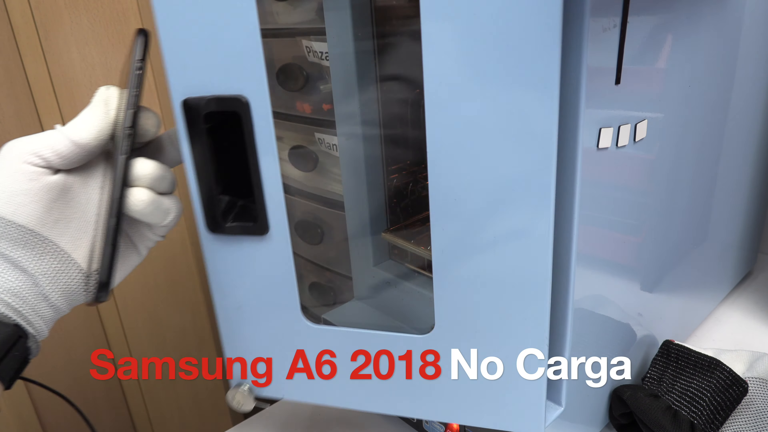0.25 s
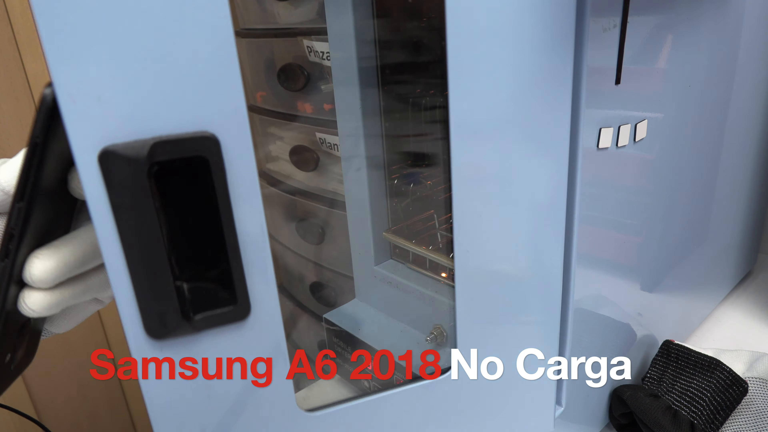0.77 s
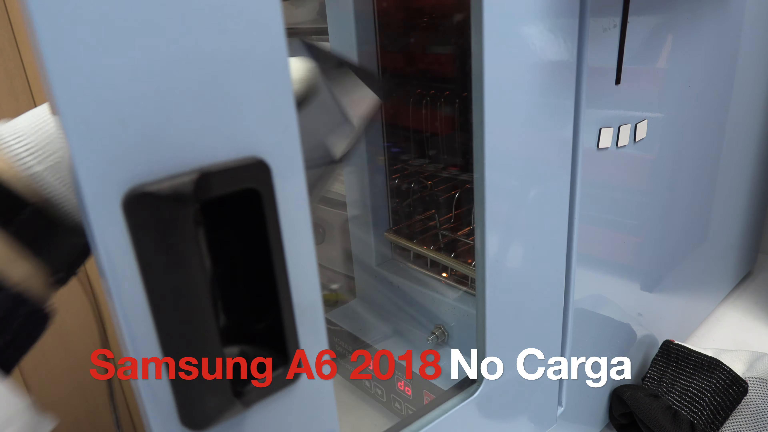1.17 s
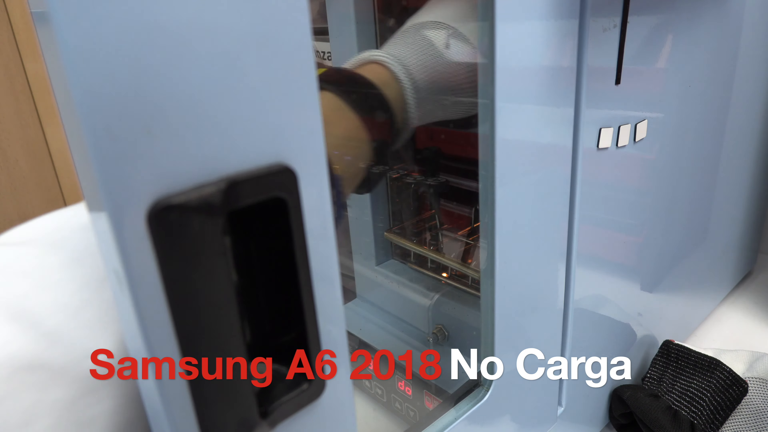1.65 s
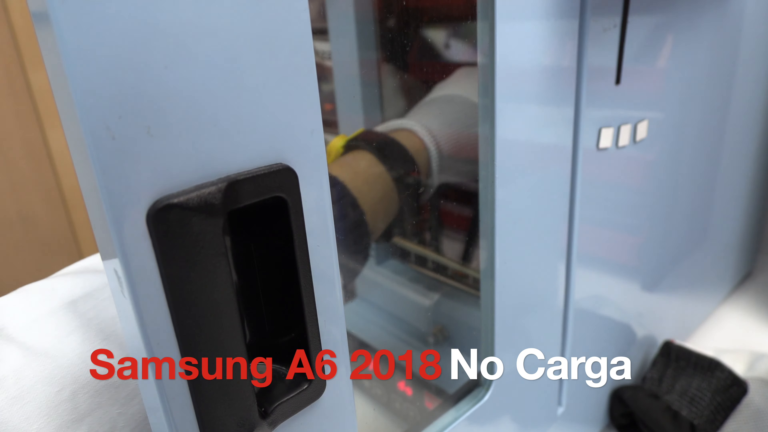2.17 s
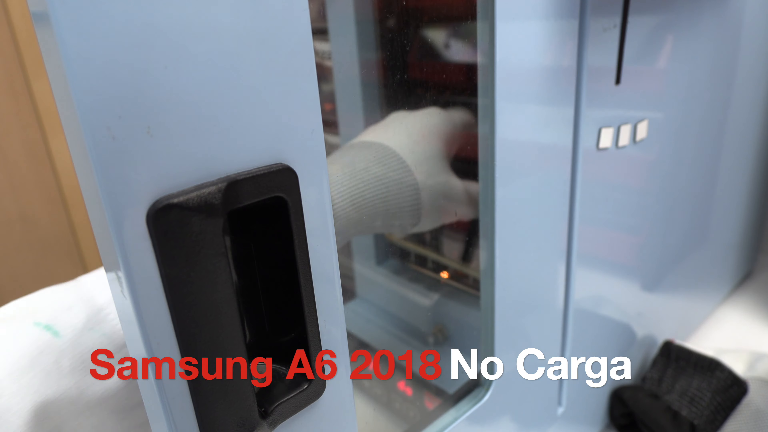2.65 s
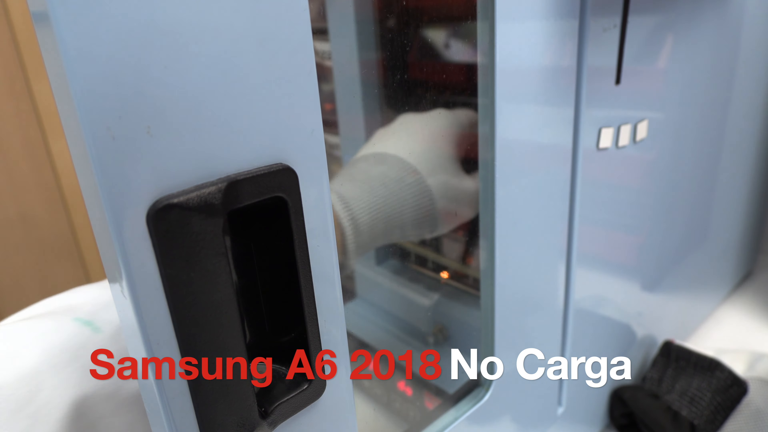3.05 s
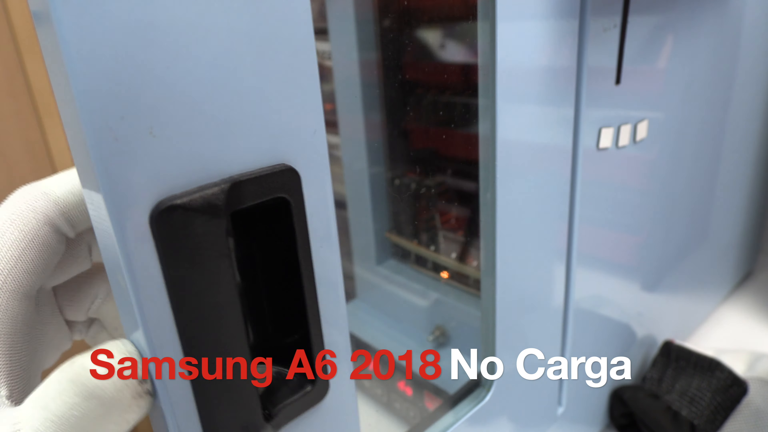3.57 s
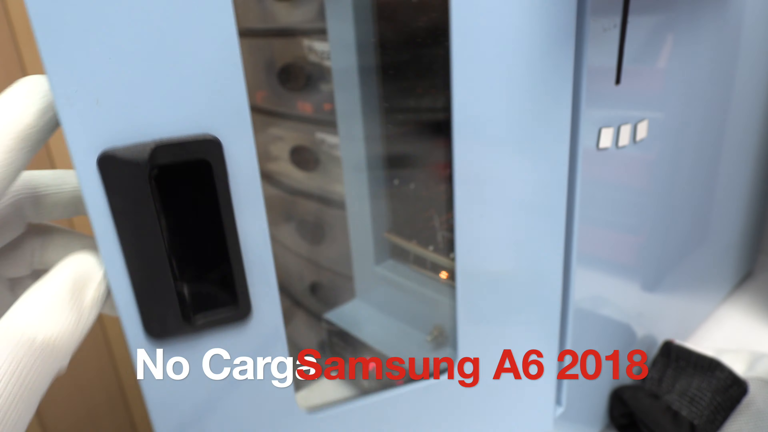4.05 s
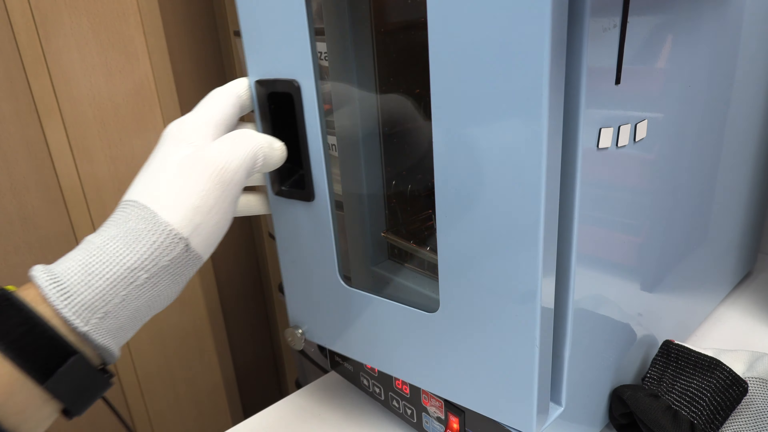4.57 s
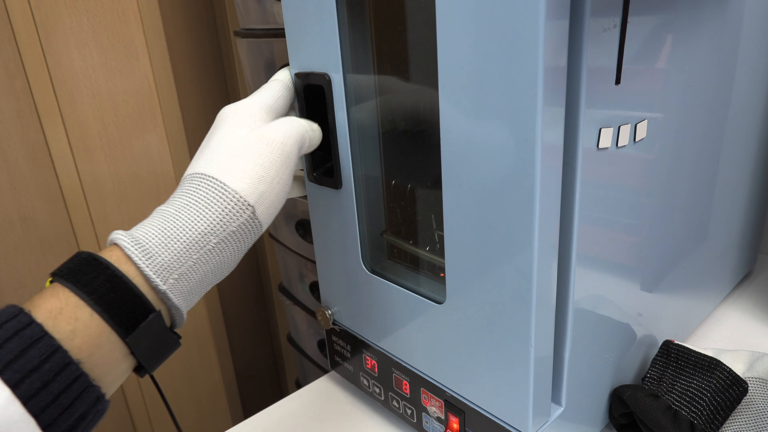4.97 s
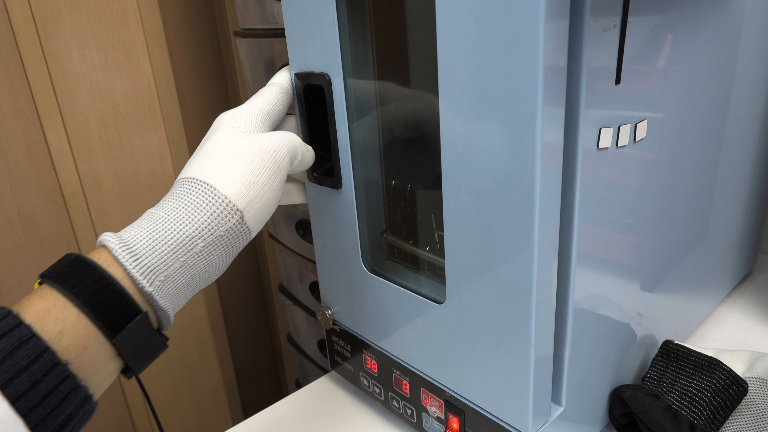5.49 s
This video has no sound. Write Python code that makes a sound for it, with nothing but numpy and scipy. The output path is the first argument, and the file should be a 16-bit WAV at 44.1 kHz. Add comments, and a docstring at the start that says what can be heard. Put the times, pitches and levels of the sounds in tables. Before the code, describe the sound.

A gloved hand clicks open a small sheet-metal cabinet door, knocks a phone onto the shelf inside, then shuts the door with a loud latch clack.

```python
"""The sheet-metal door of a small heating cabinet is opened by a gloved hand and later pressed shut on its latch.
Its blows are rattling contacts that excite damped modes, over a clack, thud and tick of shaped noise.
In between, a phone knocks on the shelf inside in the same way and drags over it as uneven, singing noise.
Glove and sleeve rub as grainy noise, and brief tones waver and die away after some blows.
The microphones stand close; decaying noise gives the echoes, steady noise and fuzzy fan tones the quiet workshop."""
import sys
import numpy as np
from scipy import signal
from scipy.fft import rfft, irfft
from scipy.io import wavfile
from scipy.ndimage import uniform_filter1d

SR = 44100
rng = np.random.default_rng(int(sys.argv[2]) if len(sys.argv) > 2 else 0)


def attenuation_scalar(level_db):
    """Turn a level in dB into a linear amplitude multiplier (20 dB per decade)."""
    decades = np.asarray(level_db, float) / 20
    return 10 ** decades


def store_pcm(level_fs):
    """Save levels as 16-bit WAV."""
    pcm = np.round(np.clip(level_fs, -1, 1) * 32767).astype(np.int16)
    wavfile.write(sys.argv[1], SR, np.atleast_2d(pcm).T)


N = 252620  # length in samples

# modes of the shelf and heated chamber: (frequency [Hz], level [dB], t60 [s])
SHELF_MODES = [(91.4, -10, 0.28), (165.9, 5, 0.43), (213.6, 1.5, 0.43), (247.2, 6, 0.16),
               (597.3, -3.5, 0.2), (645, -1, 0.12), (882, 3, 0.18), (953, 11.5, 0.051), (1197, -17, 0.13),
               (1302, 1, 0.18), (1410, -7, 0.037), (1550, -0.5, 0.17), (1670, -11, 0.14), (1774, -7, 0.066),
               (2073, -2.5, 0.054), (2200, -7, 0.12), (2300, -29, 0.1), (2820, -18, 0.087),
               (2800, -3, 0.11), (2950, -10, 0.089)]


def evened(x):
    """Scales to rms 1."""
    return x / np.sqrt(np.mean(x ** 2) + 1e-20)


def peaked(x):
    """Scales to peak 1."""
    return x / abs(x).max()


def read(points, hz):
    """Reads a table on a log-frequency axis."""
    f, value = np.transpose(points)
    return np.interp(np.log(hz + 1), np.log(f + 1), value)


def colour(x, points):
    """Filters x by a table of (frequency [Hz], gain [dB])."""
    gain = attenuation_scalar(read(points, np.fft.rfftfreq(x.shape[-1], 1 / SR)))
    return irfft(rfft(x) * gain, x.shape[-1])


def pair(size, same):
    """Left and right noise spectra, alike by the share same(Hz); with their frequencies and frame times."""
    frames, hz = size // 128 + 5, np.fft.rfftfreq(512, 1 / SR)
    a, b, c, d = rng.standard_normal((frames, 257, 4)).T
    share = np.clip(read(same, hz), -1, 1)[:, None]
    left = a + 1j * b
    right = share * left + np.sqrt(1 - share ** 2) * (c + 1j * d)
    return np.array([left, right]), hz, np.arange(frames) * 128 / SR


def air():
    """Steady workshop noise with drifting patches in time and pitch, plus the fuzzy tones of a fan."""
    # spectrum of the room air: (frequency [Hz], gain [dB])
    air_spectrum = [(18, -41), (30, -16), (64, -12.5), (158, -18), (234, -1.5), (267, -4), (355, -11),
                    (552, -6), (612, -8), (928, -11), (1000, -11), (2430, -15.5), (7630, -25.5),
                    (13200, -39), (15000, -67)]
    # left-right likeness of the room air: (frequency [Hz], likeness [0-1])
    air_same = [(60, 0.85), (180, 1), (550, 0.81), (1650, 0.58), (4970, 0.23), (15000, 0.96)]
    # fan tones: (frequency [Hz], width [Hz], level [dB])
    fan_tones = [(107.4, 43, -78), (166, 26, -78), (265.9, 11, -71.5), (335, 20, -78.5), (513, 50, -81),
                 (547.7, 5.5, -78.5), (934, 57, -81.5)]
    spectra, _, _ = pair(N, air_same)
    patches = uniform_filter1d(rng.standard_normal(spectra[0].shape), 8, 0)
    patches_db = 2.0 * evened(uniform_filter1d(patches, 30, 1))
    noise = signal.istft(spectra * attenuation_scalar(patches_db), nperseg=512, noverlap=384)[1][:, :N]
    hiss = attenuation_scalar(-64.5) * evened(colour(noise, air_spectrum))

    f = np.fft.rfftfreq(N, 1 / SR)
    white = rfft(rng.standard_normal(N))
    fan = np.zeros(N)
    for centre_hz, width_hz, db in fan_tones:
        fan += attenuation_scalar(db) * evened(irfft(white / (1 + (2 * (f - centre_hz) / width_hz) ** 2), N))
    return hiss + fan


def stroke(start, firmest, end, db, swell):
    """Pressure swells to the firmest moment and lets go; an end set ahead of that moment cuts it off."""
    ramp = np.interp(np.arange(N) / SR, [start, firmest, end], [0, 1, 0])
    return attenuation_scalar(db) * ramp ** swell  # higher swell = sharper rise and fade


def rubs():
    """Dense slips of cloth fibres on painted steel; the bright part whispers around a moving pitch."""
    # strokes of glove and sleeve:
    # (start [s], firmest [s], end [s], level of the dull part [dB], bright part relative to it [dB])
    rub_strokes = [(-.1, .01, 0.097, -54.5, -11), (0.049, 0.06, 0.14, -58.5, 0),
                   (1.038, 1.052, 1.11, -58.5, -12.5), (1.08, 1.24, 1.41, -65.5, -10),
                   (1.324, 1.433, 1.625, -61.5, -6), (1.534, 1.644, 1.97, -63, -9),
                   (2.503, 2.732, 2.9, -72.5, -10), (3.024, 3.21, 3.66, -71.5, -10),
                   (3.372, 3.407, 3.75, -67, -12), (3.912, 4.033, 4.03, -67.5, -7),
                   (4.06, 4.13, 4.2, -74, 1.1), (4.19, 4.4, 3.6, -78, 7.5), (4.652, 4.76, 4.86, -61, -15.5),
                   (4.526, 4.633, 4.762, -57, 4), (4.758, 4.852, 4.9, -59, 7.5),
                   (4.84, 4.963, 5.12, -52.5, 0)]
    # spectrum of the rubbing: (frequency [Hz], gain [dB])
    rub_spectrum = [(290, -11.5), (500, 9.5), (545, 12), (990, 3.5), (1350, 9), (1880, 11.5), (3090, 6),
                    (4940, -18.5), (5950, -15.5), (6960, -18), (11400, -32), (13400, -67.5), (15000, -57.5)]
    # path of the whisper: (time [s], centre [Hz])
    whisper_path = [(0, 5940), (1.05, 7200), (1.4, 7560), (1.7, 7800), (3.9, 6300), (4.8, 6200), (5, 5700)]
    slips = rng.standard_normal(N) * attenuation_scalar(1.15 * np.minimum(rng.exponential(1, N), 4))
    hiss = colour(slips, rub_spectrum)
    dull = signal.sosfiltfilt(signal.butter(4, 4250, fs=SR, output="sos"), hiss)

    # a resonance 900 Hz wide follows the path: shift down, smooth, shift back up
    pole = np.exp(-np.pi * 900 / SR)
    centre_hz = np.interp(np.arange(N) / SR, *np.transpose(whisper_path))
    turn = np.exp(2j * np.pi * np.cumsum(centre_hz) / SR)
    whisper = (turn * signal.lfilter([1 - pole], [1, -pole], slips / turn)).real
    bright = evened(evened(hiss - dull) + 0.3 * evened(whisper))

    out = np.zeros(N)
    for *row, bright_db in rub_strokes:
        out += stroke(*row, swell=0.9) * (evened(dull) + attenuation_scalar(bright_db) * bright)
    return out


def room(x):
    """Echoes of chamber and workshop: noise that dies away band by band."""
    # decay of the echoes: (frequency [Hz], t60 [s])
    room_decay = [(100, 0.98), (300, 0.4), (1000, 0.46), (2500, 0.44), (6000, .3), (12000, 0.26)]
    # left-right likeness of the echoes: (frequency [Hz], likeness [0-1])
    room_same = [(200, 1.), (600, 0.9), (2000, 0.79), (8000, 0.34)]
    spectra, hz, t = pair(SR // 2, room_same)
    fade = attenuation_scalar(-60 * t / read(room_decay, hz)[:, None])
    tail = signal.istft(spectra * fade, nperseg=512, noverlap=384)[1]
    tail = colour(tail, [(100, -5.5), (700, -3), (1500, -1.5), (15000, 0.0)])  # less bass comes back
    tail *= 1 - np.exp(-np.arange(tail.shape[1]) / SR / 0.00053)
    return signal.fftconvolve(x.mean(0)[None], tail / np.linalg.norm(tail[0]), axes=1)[:, :N]


def tones():
    """Single tones stand out after some blows: each holds one wavering pitch and dies away."""
    # (time [s], level [dB], frequency [Hz], t60 [s])
    tone_rows = [(.001, -51.5, 1980, 0.21), (.001, -52.5, 2770, 0.22), (.157, -34, 550, 0.031),
                 (0.645, -38.5, 1674, 0.091), (0.651, -50, 1254, 0.16), (0.658, -55, 222, 0.41),
                 (1.943, -35.5, 1530, 0.12), (2.406, -50.5, 1520, 0.13), (2.839, -48.5, 1467, 0.49),
                 (2.856, -52, 3186, 0.33), (2.902, -39, 618, 0.1), (3.003, -44.5, 630, 0.11),
                 (4.548, -46, 543, 0.17), (4.549, -45, 897, 0.23), (4.868, -49, 590, 0.041),
                 (4.992, -35, 105, 0.3), (4.998, -39.5, 415, 0.22), (5.013, -38, 261.2, 0.32)]
    out, t = np.zeros(N + SR), np.arange(SR // 2) / SR
    for s, db, hz, t60 in tone_rows:
        noise = rng.standard_normal((2, len(t)))
        sway, flutter = (evened(uniform_filter1d(v, 250)) for v in noise)
        phase = 2 * np.pi * np.cumsum(hz * (1 + 0.014 * sway)) / SR
        tone = np.sin(phase) * attenuation_scalar(3.8 * flutter)
        fade = attenuation_scalar(db - 60 * t / t60) * (1 - np.exp(-t / 0.0016))
        out[round(s * SR):][:len(t)] += tone * fade
    return out[:N]


def blows(rows, modes, crack, contact_ms, knock_db, ring_db, clack_t60, width, tail, tick_tail,
          thump_db, thump_hz, thump_width):
    """A short rattling contact rings a body: low modes thud, high ones ring in a dense clack, the treble ticks."""
    # left-right likeness of clack and tick: (frequency [Hz], likeness [0-1])
    clack_same = [(100, 1.), (500, 0.96), (1500, 0.78), (4000, 0.78), (10000, 0.68)]
    out, t = np.zeros((2, N + SR)), np.arange(SR // 2) / SR
    f = np.fft.rfftfreq(len(t), 1 / SR) + 1
    same = np.clip(read(clack_same, f), -1, 1)
    hz, db, t60 = np.transpose(modes)
    low = hz < 650  # these modes thud, the others ring
    linger = attenuation_scalar(-60 * t / clack_t60) * (1 - np.exp(-t / 0.0011))  # countless small modes linger
    for s, peak_db, thud_db, tick_db, clack_hz in rows:
        luck = rng.standard_normal((2, len(hz)))
        noise = rng.standard_normal((5, len(t)))

        # each blow lands on another spot; modes near the clack speak most
        rings = attenuation_scalar(db + 2.0 * luck[0])[:, None] * np.sin(2 * np.pi * hz[:, None] * t)
        rings *= attenuation_scalar(-60 * t / t60[:, None])
        near = np.where(low, 1, 1 / (1 + (np.log2(hz / clack_hz) / 0.4) ** 2))
        rings *= (near * np.sign(luck[1]))[:, None]

        press = np.exp(-(t * 1000 / contact_ms) ** 0.89) * (1 - np.exp(-t * 1000 / (0.17 * contact_ms)))
        press *= attenuation_scalar(1.45 * evened(uniform_filter1d(noise[4], 50)))  # the contact chatters
        ring = signal.fftconvolve(rings[~low].sum(0), noise[0] * press)[:len(t)]

        a, b, c = rfft(noise[1:4])
        both = np.array([a, same * a + np.sqrt(1 - same ** 2) * b])
        heft_db = 0.33 * np.clip(thud_db - peak_db + 15, -20, 10)  # heavy blows knock more
        knock = attenuation_scalar(knock_db + heft_db) / (1 + (np.log2(f / 700) / 0.59) ** 4)  # duller body under the clack
        clack_band = 1 / (1 + (np.log2(f / clack_hz) / width) ** 4)
        clack = evened(irfft(both * (knock + clack_band))) * (press + tail * linger)

        soft_hz = 9300 * attenuation_scalar(0.28 * (tick_db + 64))  # the softer the touch, the duller its tick
        tick = evened(colour(irfft(both / (1 + (f / soft_hz) ** 4)), crack))
        tick *= press + tick_tail * linger

        thump = evened(irfft(c / (1 + (np.log2(f / thump_hz) / thump_width) ** 4)))
        thump *= attenuation_scalar(thump_db - 60 * t / 0.24)
        low_ring = rings[low].sum(0)
        thud = low_ring / np.sqrt(np.mean(low_ring[:2000] ** 2)) + thump
        thud *= 1 - np.exp(-t / 0.0069)

        muffle_db = 0.5 * min(peak_db + 42.0, 0)  # soft touches of a glove damp the ring
        body = peaked(clack) + attenuation_scalar(ring_db + muffle_db) * peaked(ring)
        blow = attenuation_scalar(peak_db) * body + attenuation_scalar(thud_db) * peaked(thud) + attenuation_scalar(tick_db) * tick
        out[:, round(s * SR):][:, :len(t)] += blow
    return out[:, :N]


def door_blows():
    """Door panel and latch are struck by brief contacts; the clack lingers in the sheet metal."""
    # (time [s], clack level [dB], thud level [dB], tick level [dB], clack centre [Hz])
    door_rows = [(0.002, -41.5, -48, -58, 1900), (0.062, -35, -45, -51, 1780),
                 (0.132, -62, -54.5, -67, 1550), (0.155, -27.5, -71, -62, 2240),
                 (0.162, -30, -47.5, -71, 2100), (0.645, -38.5, -56.5, -64, 2000),
                 (0.743, -55, -58.5, -64, 2300), (0.957, -45.5, -56, -55, 1690),
                 (0.979, -48, -66, -62, 1420), (1.048, -67, -62, -61.5, 2180),
                 (1.089, -57, -54.5, -68, 1640), (3.44, -43, -56, -59, 2450), (3.757, -49, -60, -75, 2930),
                 (4.154, -54, -70, -58.5, 1700), (4.526, -48.5, -47, -58, 2620),
                 (4.546, -25.5, -43, -35.5, 2270), (4.558, -20.5, -43, -42.5, 2220),
                 (4.869, -48, -59.5, -53, 3020), (4.978, -18.5, -55, -35.5, 2520),
                 (4.985, -15, -46.5, -23, 2460), (4.994, -20, -33.5, -18, 2320),
                 (5.003, -23, -31, -23.5, 1760), (5.016, -24, -38, -44, 1670)]
    # modes of door panel and latch: (frequency [Hz], level [dB], t60 [s])
    door_modes = [(60.7, -4.5, 0.25), (85.6, -4.5, 0.26), (113.8, -10, 0.46), (172.8, 6.5, 0.23),
                  (210, 1.5, 0.26), (257, 8, 0.22), (337, -25, 0.16), (378, -1, 0.37), (450, 6.5, 0.17),
                  (522, 9, 0.15), (828, 5, 0.102), (1130, -1.5, 0.18), (1298, 2, 0.11), (1395, 4.5, 0.11),
                  (1780, 2.5, 0.064), (1988, -7, 0.082), (2120, -4, 0.15), (2257, -10.5, 0.077),
                  (2340, 3, 0.069), (2620, -27, 0.18), (2770, 8, 0.037), (3070, -20.5, 0.081)]
    # broad crack of a contact: (frequency [Hz], gain [dB])
    door_crack = [(1470, -23), (2500, 0.5), (3980, -28), (5050, -4), (5570, -8), (6300, -4.5), (7980, -2.5),
                  (9010, -13), (12600, -20.5), (15500, -70)]
    return blows(door_rows, door_modes, door_crack, contact_ms=3.66, knock_db=-2.5,
                 ring_db=-3.5, clack_t60=0.28, width=0.78, tail=0.19, tick_tail=0.063,
                 thump_db=4.5, thump_hz=172, thump_width=1.83)  # t60 in s, widths in octaves


def drags():
    """The phone slips unevenly over the shelf: a rough scrape that also sings in the shelf's modes."""
    # (start [s], firmest [s], end [s], level [dB])
    drag_strokes = [(1.57, 2.314, 3.2, -62.5), (2.82, 2.865, 3.5, -51), (2.65, 2.8, 3.26, -54.5)]
    slips = rng.standard_normal(N) * attenuation_scalar(4.1 * evened(uniform_filter1d(rng.standard_normal(N), 150)))
    f = np.fft.rfftfreq(N, 1 / SR)
    sing = np.zeros(len(f))
    for hz, db, t60 in SHELF_MODES:
        if hz > 500:
            sing += attenuation_scalar(db) / (1 + (2 * (f - hz) * t60 / 0.59) ** 2) ** 0.5
    scrape = evened(colour(slips, [(200, -24), (500, -10), (1500, 1.5), (3300, 7.0),
                                   (5000, -14), (8000, -14), (14000, -55)]))
    sound = evened(scrape + evened(irfft(rfft(slips) * sing, N)))
    return sound * sum(stroke(*row, swell=5.5) for row in drag_strokes)


def shelf_blows():
    """The phone knocks on the shelf: longer contacts excite the modes of shelf and chamber."""
    # (time [s], clack level [dB], thud level [dB], tick level [dB], clack centre [Hz])
    shelf_rows = [(1.942, -37.5, -41, -40, 1470), (1.951, -31.5, -28.5, -36, 1510),
                  (1.964, -30, -28.5, -28.5, 1550), (1.976, -30, -36, -41, 1200),
                  (1.989, -28.5, -29.5, -39, 1550), (2.007, -28.5, -25, -37, 1590),
                  (2.027, -34.5, -31.5, -40, 950), (2.046, -34, -40, -30.5, 953),
                  (2.066, -29.5, -29, -36, 2030), (2.253, -47.5, -54, -85, 2580),
                  (2.284, -50, -41.5, -77, 2450), (2.372, -50.5, -73, -58.5, 917),
                  (2.398, -64, -42.5, -51, 1880), (2.408, -44, -39, -56, 1450),
                  (2.44, -40, -40.5, -42.5, 2000), (2.477, -49.5, -45, -48.5, 2200),
                  (2.754, -45, -63, -54, 1030), (2.764, -46.5, -44.5, -64, 1300),
                  (2.841, -53, -48, -63, 1500), (2.856, -41, -67, -56.5, 1440),
                  (2.896, -37, -47, -47, 1550), (2.908, -38.5, -38, -39.5, 1600),
                  (2.936, -35.5, -64, -43.5, 2100), (2.957, -44, -42.5, -43, 1540),
                  (3, -37, -40, -46.5, 1740), (3.019, -44, -66, -46.5, 1321), (3.05, -57, -42.5, -77, 2500)]
    # broad crack of a contact within the chamber: (frequency [Hz], gain [dB])
    shelf_crack = [(1470, -12), (2500, -3.5), (3190, -6.5), (3750, -16.5), (4170, -7), (4430, -11),
                   (4860, -4.5), (5530, -5.5), (6390, -10), (7560, -2), (9880, -16.5), (13500, -22),
                   (15500, -62)]
    return blows(shelf_rows, SHELF_MODES, shelf_crack, contact_ms=8.2, knock_db=-9.5,
                 ring_db=-3.5, clack_t60=0.13, width=1.0, tail=0.48, tick_tail=0.07,
                 thump_db=-2.0, thump_hz=223, thump_width=0.66)  # t60 in s, widths in octaves


def scene():
    """Direct sounds lean a little to the left; their echoes and the workshop air join them."""
    door, shelf = door_blows(), shelf_blows()
    slides, ringing = rubs() + drags(), tones()
    lean = attenuation_scalar(np.array([[0.4], [-0.4]]))  # left, right
    near = (door + shelf + slides + ringing) * lean
    to_room = attenuation_scalar(-12) * door + attenuation_scalar(-7) * shelf + attenuation_scalar(-3.0) * slides + attenuation_scalar(-17.5) * ringing
    return near + room(to_room) + air()


def band_limit(x):
    """A steep low-pass at the top of the band."""
    return signal.sosfilt(signal.butter(12, 15710, fs=SR, output="sos"), x)


def record(dry):
    """A small microphone pair loses the deepest bass, below 48 Hz."""
    thin = signal.sosfilt(signal.butter(4, 48, "high", fs=SR, output="sos"), dry)
    return band_limit(thin)


dry = scene()
out = record(dry)
store_pcm(out)
```